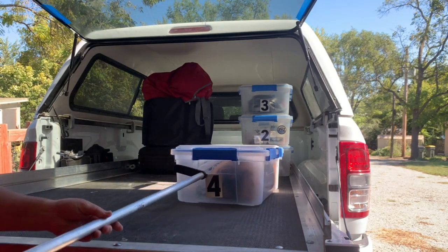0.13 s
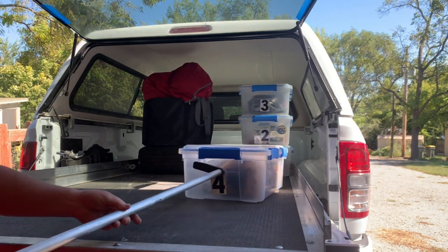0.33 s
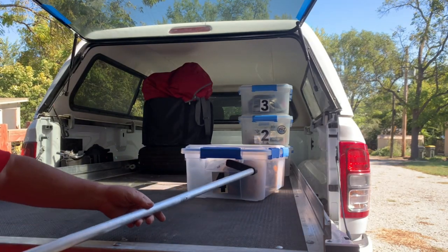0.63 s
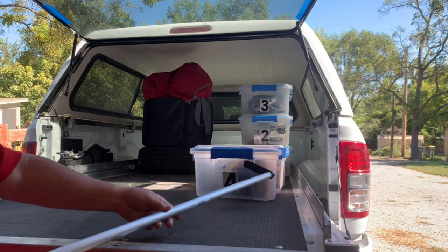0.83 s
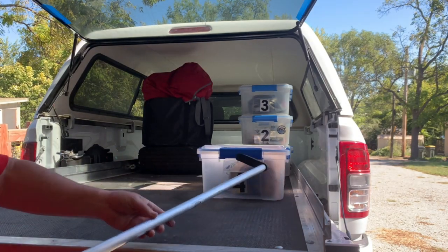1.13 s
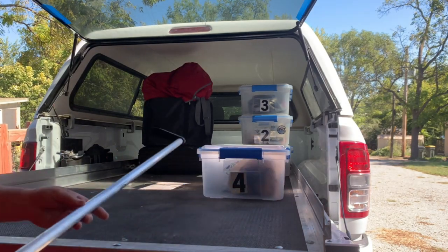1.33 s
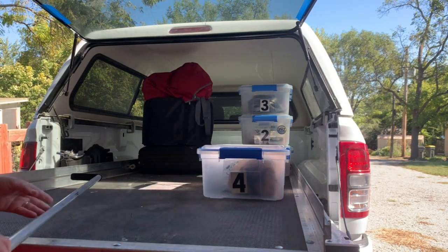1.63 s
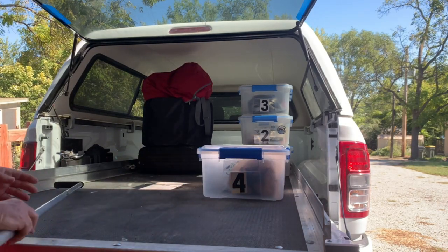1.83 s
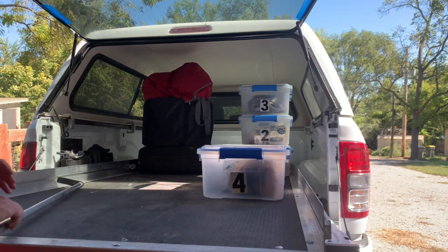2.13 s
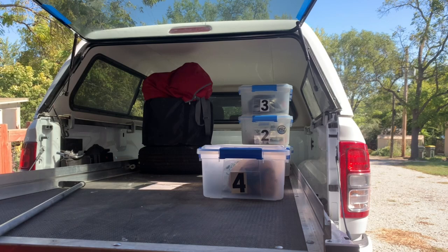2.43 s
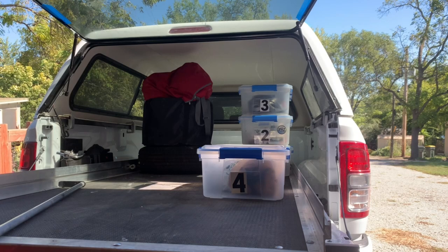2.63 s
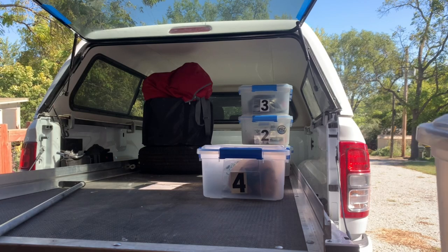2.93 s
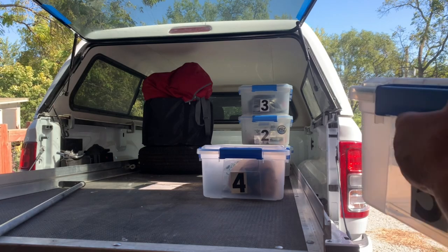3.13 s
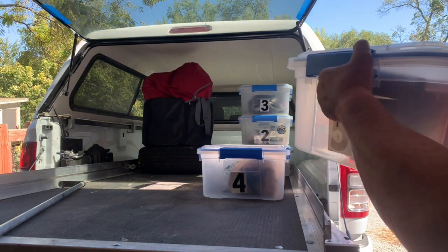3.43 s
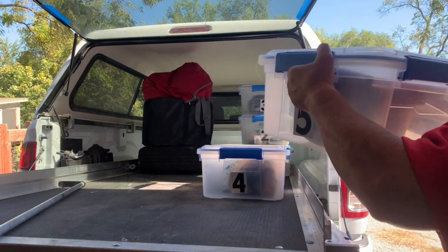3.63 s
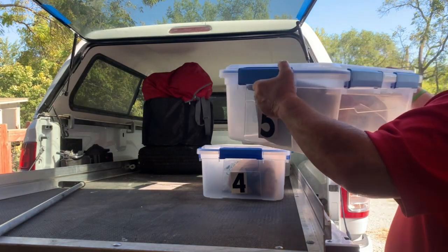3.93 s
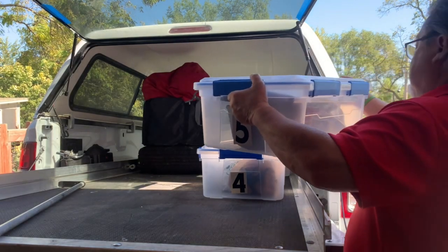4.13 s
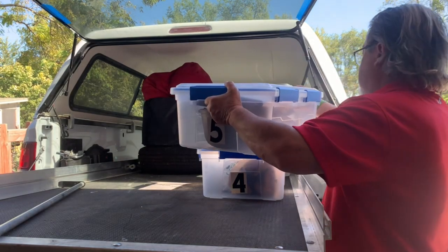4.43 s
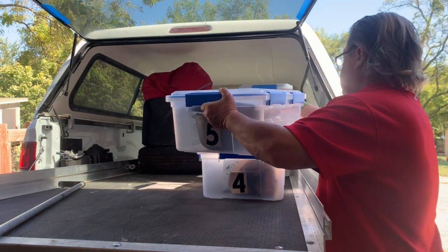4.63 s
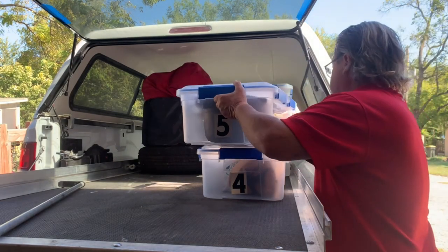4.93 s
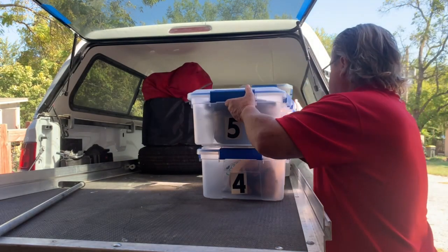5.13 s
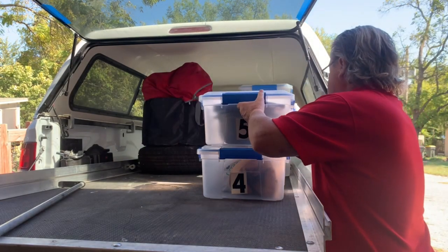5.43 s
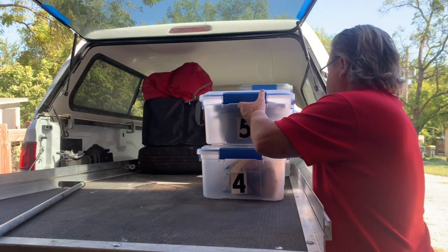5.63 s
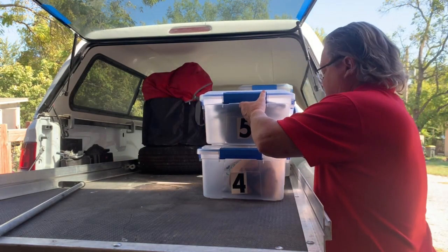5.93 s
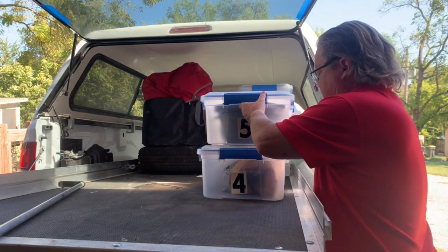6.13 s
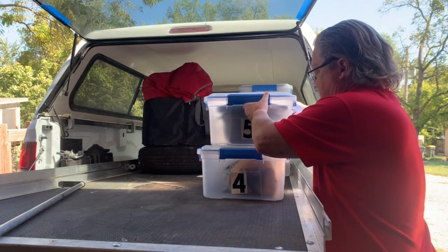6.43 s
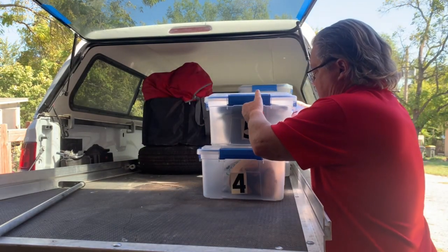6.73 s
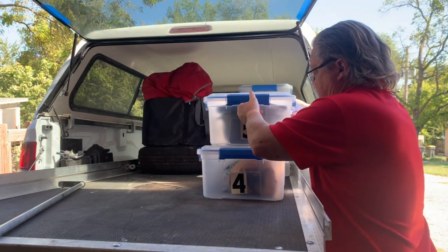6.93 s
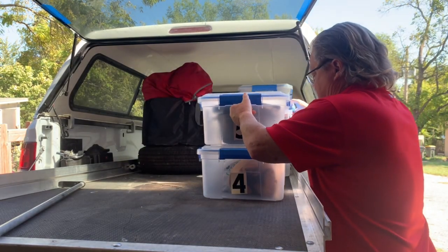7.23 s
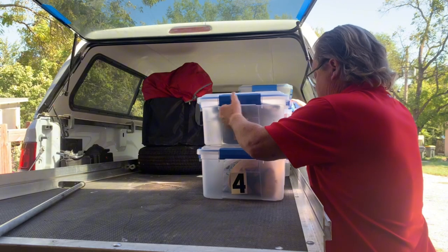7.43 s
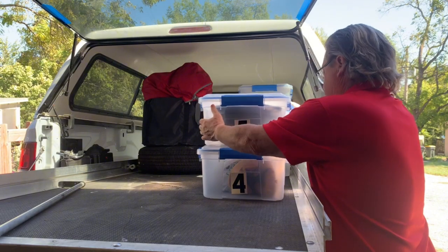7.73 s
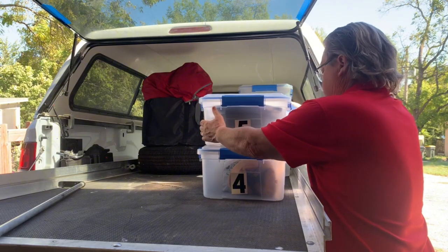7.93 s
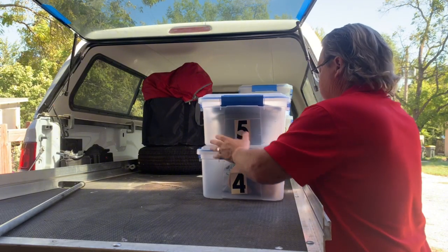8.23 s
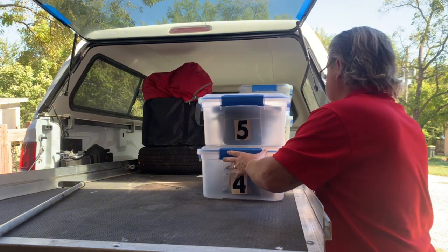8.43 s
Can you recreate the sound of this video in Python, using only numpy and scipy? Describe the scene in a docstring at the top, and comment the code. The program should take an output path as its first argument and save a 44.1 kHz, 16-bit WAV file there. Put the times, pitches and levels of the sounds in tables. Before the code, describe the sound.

Close, slightly boxy sound from a truck bed under a hard canopy, in quiet open air. A plastic bin is knocked and scraped inward for about a second; a hollow metal tube then falls, bouncing ever faster. Faint handling and shifting contents lead to a cluster of knocks and loud plastic-on-plastic scraping, small lid ticks, and several short shoves ending in a heavy, slightly distorted thump.

```python
"""Plastic storage bins are loaded into a covered pickup bed, heard from the tailgate: knocks ring
their walls, and friction made of tiny random slips scrapes and hisses. A metal pole pushes one bin in,
is let go and clatters on the bed as a set of ringing modes. A second bin is carried up, set on the first
and shoved home in jerks. The canopy adds a short noise tail over quiet open air; hard blows overload
the microphone."""
import sys
import numpy as np
from scipy import signal
from scipy.fft import rfft, irfft, next_fast_len
from scipy.io import wavfile
from scipy.ndimage import uniform_filter1d

SR = 44100
rng = np.random.default_rng(int(sys.argv[2]) if len(sys.argv) > 2 else 0)


def dump(signal):
    """Clip the signal to [-1, 1] and save it as 16-bit WAV at the path in sys.argv[1]."""
    limited = np.clip(np.atleast_2d(signal).T, -1, 1)
    pcm = np.round(limited * 32767).astype(np.int16)
    wavfile.write(sys.argv[1], SR, pcm)


N = 377937  # length in samples
RING = np.arange(32768) / SR  # time axis of one ringing sound, s

# All levels in the tables are relative: later steps mix, filter and overload them.
# open air: [f/Hz, level/dB]
AIR_COLOUR = [(12, -49), (20, -32), (64, -2), (92, -14), (183, -16.5), (319, -22.5), (357, -25.5),
              (387, -21), (6720, -48), (8620, -44.5), (15000, -46.5)]
AIR_DB = -61.5

# the pole head scuffs across the bin wall: [t/s, length/s, level/dB, resonance f/Hz, place of peak 0-1]
SCUFFS = [(0.311, 0.11, -52, 7260, 0.33), (0.415, 0.014, -42.5, 8100, .9), (0.58, 0.29, -55.5, 3040, 0),
          (0.705, 0.11, -61, 5800, .15), (.78, 0.2, -48.5, 2070, 0.74), (0.757, 0.24, -61.5, 10100, 0.6)]
SCUFF_Q = 2.6  # sharpness of the resonance
# the tube slips through the hand: [t/s, length/s, level/dB]
SLIP = (1.43, 0.31, -75)
# hands and sleeves brush pole and plastic: [t/s, length/s, level/dB, centre f/Hz, place of peak 0-1]
BRUSHES = [(1.318, 0.14, -70.5, 3000, 0.45), (1.667, 0.061, -67, 4000, 0.3),
           (2.798, 0.032, -61.5, 4100, 0.96), (2.947, 0.015, -64, 2500, 0.5),
           (3.018, 0.1, -54.5, 4410, 0.08), (3.127, 0.23, -67, 2500, 0.23), (3.577, 0.075, -65, 4000, 0.07),
           (4.059, 0.05, -46.5, 3900, 0.05), (4.458, 0.1, -63, 4400, 0.05), (7.041, 0.19, -55, 6400, .45),
           (8.035, 0.21, -60.5, 7300, 0.48), (8.462, 0.062, -51, 3870, 0.65)]
BRUSH_WIDTH_HZ = 7200
# the load shifts inside the second bin: [t/s, length/s, level/dB]
SHIFTS = [(3.012, .12, -52.5), (3.117, 0.23, -51.5), (3.552, 0.19, -56.5), (7.701, 0.11, -33.5),
          (8.036, 0.15, -54)]
SHIFT_PEAK = 0.22  # share of the length
# hollow resonances that the load rubs: [f/Hz, width/Hz, level/dB]
HOLLOW = [(457, 114, -4.5), (775, 156, -3.5), (1050, 1020, -8)]

# the pole falls, first on its ends and then flat: [t/s, strength level/dB, hardness/dB]
# a harder blow has more clang of the tube and less boom of the bed
DROPS = [(1.7748, -28.5, 8), (1.931, -27, -7.5), (2.031, -28, -4), (2.202, -16, -1.5), (2.225, -17, -0.5),
         (2.26, -27, -2.5), (2.312, -25.5, -5.5)]
# modes of the metal pole: [f/Hz, level/dB, 60 dB decay t/s]
POLE_MODES = [(318.8, 9.5, 0.48), (591, 4, 0.16), (613, -19, 0.29), (750, -18.5, .24), (825, 16.5, 0.16),
              (1006, 11, 0.34), (1278, -10.5, 0.13), (1460, 5, 0.11), (1618, 5, 0.092), (1680, -21, 0.17),
              (1860, 2.5, 0.19), (2020, -4.5, 0.095), (2240, 0.5, 0.21), (2580, -9, 0.093),
              (8450, -23.5, 0.18)]
# dense clang of the tube: [f/Hz, level/dB]
CLANG_COLOUR = [(80, -16), (220, 2.5), (400, 3), (900, 3), (1600, 0.5), (2500, -11.5), (4000, -30),
                (12000, -46)]
# dense boom of the bed: [f/Hz, level/dB]
BED_COLOUR = [(50, -15.5), (120, -4.5), (220, -2.5), (420, 9.5), (650, -16.5), (1000, -13.5), (3000, -61.5)]
# modes of the bed panel under the pole: [f/Hz, level/dB, 60 dB decay t/s]
BED_MODES = [(217.3, -12.5, 0.56), (311, -7, 0.16), (473, -9, 0.31), (645.7, -3, 0.16)]
# then the pole chatters to rest, each bounce sooner and weaker than the last
CHATTER_S, CHATTER_DB, CHATTER_HARDNESS_DB = 2.364, -19, 2.5
BOUNCE_GAP_S, BOUNCE_SHRINK, BOUNCE_LOSS_DB = .045, .86, 2
FLAT_FROM_S = 2.15  # later blows land flat
# rattle of the head, relative to a blow of RATTLE_REF_DB
END_RATTLE_DB, FLAT_RATTLE_DB, RATTLE_REF_DB = -14, -4, -20
RATTLE_GROWTH = 0.32  # further dB of rattle for each dB of strength

# the pole head pokes the first bin: [t/s, strength level/dB, hardness/dB]
POKES = [(0.021, -38, 2.5), (0.058, -29, 3), (0.354, -34, 0.5), (0.377, -31.5, 3), (0.423, -30.5, 2),
         (0.455, -32.5, 7), (0.53, -37, -0.5)]
# the second bin bumps and lands, and at the end a hand pats it: [t/s, strength level/dB, hardness/dB]
KNOCKS = [(3.522, -52.5, 2), (3.642, -31, 1.5), (3.653, -45, -6), (4.469, -59.5, -6.5), (4.564, -32.5, -3),
          (4.586, -30, 7), (4.738, -32, 2), (4.791, -24.5, -1.5), (4.85, -29.5, -1), (4.879, -23, 2.5),
          (4.907, -26.5, -0.5), (5.004, -27.5, 4), (5.071, -28.5, 4), (5.148, -31, -5), (5.858, -48.5, 0),
          (6.425, -31, -2), (6.437, -29.5, 0), (6.805, -49.5, 3), (7.035, -41, 1), (7.103, -31, -4),
          (7.135, -38, 11.5), (7.422, -41.5, 2.5), (7.666, -28.5, -4), (7.685, -25, -1), (7.73, -36, -2.5),
          (8.11, -47, 1), (8.52, -31.5, -6)]
# modes of a loaded bin on the bed, deepest first: [f/Hz, level/dB, 60 dB decay t/s]
BIN_MODES = [(63.6, -26, 1), (90.1, 2, 0.19), (119.5, -1.5, 0.19), (162, 3, 0.182), (216.6, -0.5, 0.17),
             (255.8, 7.5, 0.064), (312, -15, 0.033)]
# modes of its thin walls: [f/Hz, level/dB, 60 dB decay t/s]
WALL_MODES = [(428, 12, 0.14), (504, -6.5, 0.68), (563, -5, 0.35), (620, 15, 0.051), (741.6, 14.5, 0.076),
              (904, 13.5, 0.021), (1028, 17, 0.029), (1304, 3, 0.07)]
# dense ring of walls and contents: [f/Hz, level/dB]
WALL_COLOUR = [(120, -18), (300, 4.5), (600, 2.5), (1200, -22), (1800, -26), (3000, -75), (8000, -53)]
# tick of the rim, also the rattle of the pole head: [f/Hz, level/dB]
TICK_COLOUR = [(600, -11.5), (1600, 10.5), (2600, 6), (4000, -2), (8000, -9), (15000, -18.5)]
# a harder contact takes from the thump and gives to the tick
TICK_DB, TICK_PER_HARDNESS = -18.5, 0.82  # tick of a blow of hardness 0 and strength KNOCK_REF_DB
TICK_GROWTH, KNOCK_REF_DB = 0.15, -30  # further dB of tick for each dB of strength over KNOCK_REF_DB

# the full weight of a bin lands and booms: [t/s, f/Hz, level/dB]
SETTLES = [(0.531, 90.7, -44), (3.655, 62.8, -35.5), (6.424, 90, -32.5), (7.116, 108, -35.5),
           (7.687, 123.8, -21)]
SETTLE_T60_S = .22
# something in the load rings on after the last shove: [f/Hz, level/dB, 60 dB decay t/s]
LOAD_MODES = [(1340, 1, 1.7), (1916, -1, 0.8), (2272, 0, 1.35), (2310, 0, 1.3)]
LOAD_RING_S, LOAD_RING_DB = 7.69, -60
# small ticks of the lid under load: [t/s, level/dB]
TAPS = [(5.708, -56), (5.765, -55.5), (5.914, -59), (6.316, -55), (6.616, -50.5), (6.804, -46.5),
        (7.291, -52.5), (7.383, -51), (7.479, -50)]
# hollow sound of those ticks: [f/Hz, level/dB]
TAP_COLOUR = [(400, 11.5), (900, 4), (1400, 8), (2000, -18), (4000, -24), (10000, -32)]

# the first bin pushed over the bed mat: [t/s, scrape level/dB, hiss level/dB]
PUSH = [(0.0, -48, -63), (0.118, -45, -56), (0.232, -49.5, -57.5), (0.31, -54, -56.5), (0.434, -46.5, -59),
        (0.548, -52, -95), (0.824, -53, -66), (0.964, -58, -79), (1.05, -69.5, -85)]
# the second bin slid along the lid of the first: [t/s, scrape level/dB, hiss level/dB]
STACK = [(4.565, -34, -52), (4.695, -46, -58.5), (4.729, -56, -87), (4.739, -38.5, -56),
         (4.845, -35.5, -53), (4.855, -31, -51), (4.953, -33.5, -51.5), (5.085, -32.5, -39),
         (5.197, -46, -50), (5.273, -41, -36), (5.447, -41.5, -51.5), (5.553, -60, -76), (5.675, -54, -70),
         (5.75, -78, -98)]
# the second bin shoved home in jerks: [fastest t/s, run-up/s, level/dB, judder against scrape/dB]
SHOVES = [(6.122, 0.15, -37.5, -9), (6.448, 0.19, -40, 1), (6.58, 0.024, -55.5, 6),
          (7.132, 0.29, -43, -4.5), (7.55, 0.11, -46.5, -2), (7.71, 0.13, -40, 2.5)]
SHOVE_STOP_S = 0.16
# the hiss against the scrape at a scrape of HISS_REF_DB, and the power of the speed by which it grows
SHOVE_HISS_DB, HISS_REF_DB, HISS_GROWTH = -10.5, -40, 1.26
# coarse shaking of a sliding bin: [f/Hz, level/dB]
JUDDER_COLOUR = [(30, -40), (65, -5), (120, 8), (190, 8), (300, 1.5), (500, 4.5), (1000, -84)]
# scrape over the bed mat: [f/Hz, level/dB]
MAT_COLOUR = [(60, -27), (180, 9), (400, 11), (750, 8), (1100, 9), (1700, 1.5), (2500, 1), (4000, -21.5)]
# scrape along the lid: [f/Hz, level/dB]
LID_COLOUR = [(150, -7), (280, 5), (430, -2), (580, 6), (730, 7.5), (1000, 3.5), (1400, 0.5), (1900, -7),
              (2400, -7.5), (4000, -61)]
# scrape of a seated bin on the ridges of the lid: [f/Hz, level/dB]
RIDGE_COLOUR = [(150, -5), (280, 2), (450, -0.5), (730, 2.5), (1000, -1.5), (1450, 0), (1900, -7.5),
                (2500, -12), (4000, -33.5)]
# finest slips of the friction: [f/Hz, level/dB]
HISS_COLOUR = [(1500, 2), (2800, -1), (4500, -5.5), (7500, -6.5), (10000, -14), (15000, -20.5)]

CLIP_LEVEL = .086  # ceiling of the microphone, full scale = 1
TOP_HZ = 15850  # the treble ends here


def undb(db):
    """Turn decibels into a gain."""
    return 10 ** (np.asarray(db) / 20)


def unit(x):
    """Scale a sound to an average strength (rms) of 1."""
    return x / np.sqrt(np.mean(x ** 2))


def blow(x, size=1024):
    """Scale a ringing sound so that its first samples have rms 1."""
    return x / np.sqrt(np.mean(x[:size] ** 2))


def add(out, s, x):
    """Mix x into out from time s."""
    i = max(int(s * SR), 0)
    out[i:i + len(x)] += x[:N - i]


def colour(x, points):
    """Shape the spectrum of x by (Hz, dB) points."""
    hz, db = np.transpose(points)
    size = next_fast_len(len(x))
    f = np.arange(size // 2 + 1) * SR / size
    gain = undb(np.interp(np.log(f + 1), np.log(hz), db))
    return irfft(rfft(x, size) * gain, size)[:len(x)]


def fade(t60):
    """Let a ring die away steadily, by 60 dB in t60 seconds."""
    return undb(-60 * RING / t60)


def soften(x, contact_s):
    """A yielding contact lets the ring build up instead of snapping on."""
    return blow(x * (1 - np.exp(-RING / contact_s)))


def modes(table, detune):
    """A struck body rings at its own notes; each blow shares its energy a little differently."""
    out = 0
    chances = rng.standard_normal((len(table), 3))
    for (hz, db, t60), (gain, pitch, side) in zip(table, chances):
        tone = np.sin(2 * np.pi * hz * (1 + detune * pitch) * RING)
        out = out + np.sign(side) * undb(db + 2 * gain) * fade(t60) * tone
    return blow(out)


def crash(points, t60, contact_s=.0005):
    """Modes too dense to tell apart: a dying burst of coloured noise."""
    noise = colour(rng.standard_normal(len(RING)), points)
    return soften(noise * fade(t60), contact_s)


def twang(rest_hz, rise, settle_s, t60):
    """A panel flexed hard rings sharp at first and sinks to its rest pitch."""
    hz = rest_hz * (1 + rise * np.exp(-RING / settle_s))
    hz = hz * (1 + .04 * rng.standard_normal())  # each blow has a slightly different pitch
    return blow(np.sin(2 * np.pi * np.cumsum(hz) / SR) * fade(t60))


def walk(rate):
    """A slow random wander with a spread near 1, picking a new target rate times a second."""
    k = int(SR / rate)
    steps = np.repeat(rng.standard_normal(N // k + 1), k)
    return uniform_filter1d(steps, k)[:N]


def grains(size, per_s, spread_db):
    """Friction is made of tiny slips at random moments and of uneven strength."""
    slips = rng.random(size) < per_s / SR
    strength = undb(spread_db * np.minimum(rng.exponential(size=size), 4))
    return slips * rng.standard_normal(size) * strength


def swell(length, peak, sharpness):
    """The speed of a rub or shove rises to a peak and dies away."""
    size = int(length * SR)
    place = np.arange(size) / size
    return np.interp(place, [0, np.clip(peak, .02, .98), 1], [0, 1, 0]) ** sharpness


def outdoors():
    """Quiet open air: coloured noise with a wavering level."""
    air = unit(colour(rng.standard_normal(N), AIR_COLOUR))
    return air * undb(AIR_DB + 0.54 * walk(18))


def canopy(x, wet_db, low_t60, high_t60):
    """The hard shell over the bed returns a short noise tail, with its treble weaker than its bass."""
    noise = rng.standard_normal(len(RING))
    low = signal.sosfilt(signal.butter(2, 2200, fs=SR, output="sos"), noise)
    tail = low * fade(low_t60) + undb(-4) * (noise - low) * fade(high_t60)
    tail = tail * (RING > .006)  # a short gap before the tail, s
    tail = tail / np.linalg.norm(fade(low_t60))
    return x + undb(wet_db) * signal.fftconvolve(x, tail)[:N]


def rub(length, peak, hz, width):
    """A brief swell of friction sounds through one resonance of the rubbed part."""
    speed = swell(length, peak, sharpness=0.8)
    b, a = signal.iirpeak(hz, hz / width, fs=SR)
    slips = signal.lfilter(b, a, grains(len(speed), per_s=8000, spread_db=0.5))
    return speed * unit(signal.lfilter(b, a, slips))  # filtered twice for a steeper resonance


def rubs():
    """The pole scuffs and slips, hands brush the plastic and the load shifts in its bin."""
    out = np.zeros(N)
    for s, length, db, hz, peak in SCUFFS:
        add(out, s, undb(db) * rub(length, peak, hz, hz / SCUFF_Q))
    for s, length, db, hz, peak in BRUSHES:
        add(out, s, undb(db) * rub(length, peak, hz, BRUSH_WIDTH_HZ))
    for s, length, db in SHIFTS:
        for hz, width, hollow_db in HOLLOW:
            add(out, s, undb(db + hollow_db) * rub(length, SHIFT_PEAK, hz, width))
    s, length, db = SLIP
    highest_hz = POLE_MODES[-1][0]  # the slipping tube sings on its highest mode
    add(out, s, undb(db) * rub(length, peak=0.43, hz=highest_hz, width=490))
    return out


def chatter(count):
    """Bounces come ever sooner and weaker; gives rows like those of DROPS."""
    k = np.arange(count)
    shrink = BOUNCE_SHRINK ** k
    times = CHATTER_S + BOUNCE_GAP_S * (np.cumsum(shrink) - shrink)
    return [(s, CHATTER_DB - BOUNCE_LOSS_DB * n, CHATTER_HARDNESS_DB) for n, s in zip(k, times)]


def pole():
    """The tube clangs at each bounce, the bed panel booms and the loose head rattles."""
    out = np.zeros(N)
    for s, db, hardness_db in DROPS + chatter(count=6):
        clang = modes(POLE_MODES, detune=0.0047)
        clang = blow(clang + undb(8) * crash(CLANG_COLOUR, t60=0.13, contact_s=0.00014))
        boom = undb(-7.5) * modes(BED_MODES, detune=.025)
        boom += undb(-5.5) * crash(BED_COLOUR, t60=0.45)
        boom += undb(-4) * twang(rest_hz=345, rise=.85, settle_s=.045, t60=.22)
        rattle = crash(TICK_COLOUR, t60=0.17)
        rattle_db = FLAT_RATTLE_DB if s > FLAT_FROM_S else END_RATTLE_DB
        rattle_db += RATTLE_GROWTH * (db - RATTLE_REF_DB)
        hit = undb(hardness_db) * clang + undb(-hardness_db) * boom + undb(rattle_db) * rattle
        add(out, s, undb(db) * hit)
    return out


def taps():
    """The loaded lid gives way in small hollow ticks."""
    out = np.zeros(N)
    for s, db in TAPS:
        add(out, s, undb(db) * crash(TAP_COLOUR, t60=0.023))
    return out


def settles():
    """A bin dropping onto its full weight booms on a deep note; the last drop leaves its load ringing."""
    out = np.zeros(N)
    for s, hz, db in SETTLES:
        note = np.sin(2 * np.pi * hz * RING) * fade(SETTLE_T60_S)
        add(out, s, undb(db) * soften(note, contact_s=0.00037))
    add(out, LOAD_RING_S, undb(LOAD_RING_DB) * modes(LOAD_MODES, detune=0.0016))
    return out


def shell(x, t60, ring_db, count):
    """Close plastic walls add a short, dense ring that changes as the contact moves over them."""
    shares = np.array([walk(9) for _ in range(count)])
    highpass = signal.butter(2, 900, "high", fs=SR, output="sos")
    wet = 0
    for share in shares / np.linalg.norm(shares, axis=0):
        ring = signal.sosfilt(highpass, rng.standard_normal(len(RING))) * fade(t60)
        wet = wet + share * signal.oaconvolve(x, ring[:4096] / np.linalg.norm(ring))[:N]
    return (x + undb(ring_db) * wet) / np.hypot(1, undb(ring_db))


def friction(judder_gain, scrape_gain, hiss_gain, scrape_colour):
    """Coarse slips shake the bin, finer ones scrape its walls, the finest hiss."""
    judder = unit(colour(grains(N, per_s=860, spread_db=2.0), JUDDER_COLOUR))
    scrape = unit(colour(grains(N, per_s=2200, spread_db=1.9), scrape_colour))
    hiss = unit(colour(grains(N, per_s=14000, spread_db=2.0), HISS_COLOUR))
    slips = judder_gain * judder + scrape_gain * scrape + hiss_gain * hiss
    slips = slips * undb(2 * walk(60))  # the contact grips and lets go
    return shell(slips, t60=0.022, ring_db=-3, count=5)


def slide(curve, scrape_colour, judder_db, scrape_db, hiss_db):
    """One long slide follows a drawn level curve; the judder follows the scrape."""
    s, scrape_curve, hiss_curve = np.transpose(curve)
    t = np.arange(N) / SR
    # silent before and after the curve
    scrape = undb(np.interp(t, s, scrape_curve, left=-np.inf, right=-np.inf))
    hiss = undb(np.interp(t, s, hiss_curve, left=-np.inf, right=-np.inf))
    return friction(scrape * undb(judder_db), scrape * undb(scrape_db), hiss * undb(hiss_db), scrape_colour)


def shoves():
    """Each jerk gathers speed over the lid and stops short; the hiss grows faster than the speed."""
    speed, judder = np.zeros(N), np.zeros(N)
    for s, run_up, db, judder_db in SHOVES:
        length = run_up + SHOVE_STOP_S
        jerk = undb(db) * swell(length, run_up / length, sharpness=1.11)
        add(speed, s - run_up, jerk)
        add(judder, s - run_up, jerk * undb(judder_db))
    hiss = undb(HISS_REF_DB + SHOVE_HISS_DB) * (speed / undb(HISS_REF_DB)) ** HISS_GROWTH
    return friction(judder, speed, hiss, RIDGE_COLOUR)


def knocks(blows, body_modes, thump_db):
    """Each blow rocks the loaded bin, rings its walls and ticks at the rim."""
    out = np.zeros(N)
    for s, db, hardness_db in blows:
        thump = soften(modes(body_modes, detune=0.085), contact_s=0.0011)
        wall = modes(WALL_MODES, detune=0.0368) * undb(-2) + crash(WALL_COLOUR, t60=0.06)
        wall = soften(wall, contact_s=.0006)
        tick = crash(TICK_COLOUR, t60=0.049, contact_s=.0001)
        tick_db = TICK_DB + TICK_PER_HARDNESS * hardness_db + TICK_GROWTH * (db - KNOCK_REF_DB)
        hit = undb(thump_db - hardness_db) * thump + undb(-3.5) * wall + undb(tick_db) * tick
        add(out, s, undb(db) * hit)
    return out


def scene():
    """Everything in the truck bed rings under the canopy, with the open air added."""
    first_bin = knocks(POKES, BIN_MODES[2:], thump_db=-4.5)  # a poke leaves the deepest modes still
    first_bin += slide(PUSH, MAT_COLOUR, judder_db=-9, scrape_db=2, hiss_db=2)
    second_bin = knocks(KNOCKS, BIN_MODES, thump_db=-1.5) + settles() + taps() + shoves()
    second_bin += slide(STACK, LID_COLOUR, judder_db=-0.5, scrape_db=-3, hiss_db=3.5)
    uneven_rubs = rubs() * undb(1.87 * walk(70))  # their level flickers
    bed = first_bin + second_bin + pole() + uneven_rubs
    return (canopy(bed, wet_db=-7, low_t60=0.36, high_t60=0.37) + outdoors())[None]


def record(dry):
    """The microphone overloads with flat tops; the highest treble is rounded and cut."""
    drive = dry / CLIP_LEVEL
    clipped = CLIP_LEVEL * drive / (1 + drive ** 8) ** (1 / 8)
    rounded = signal.sosfilt(signal.butter(1, 15000, fs=SR, output="sos"), clipped)
    return signal.sosfilt(signal.ellip(10, .2, 70, TOP_HZ, fs=SR, output="sos"), rounded)


dry = scene()
out = record(dry)
dump(out)
```